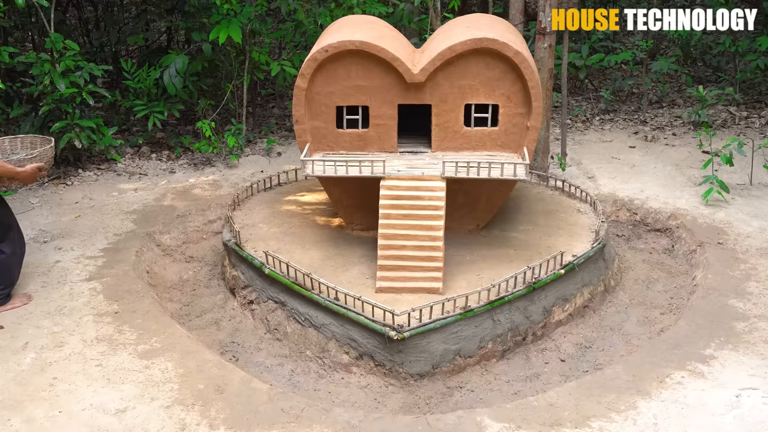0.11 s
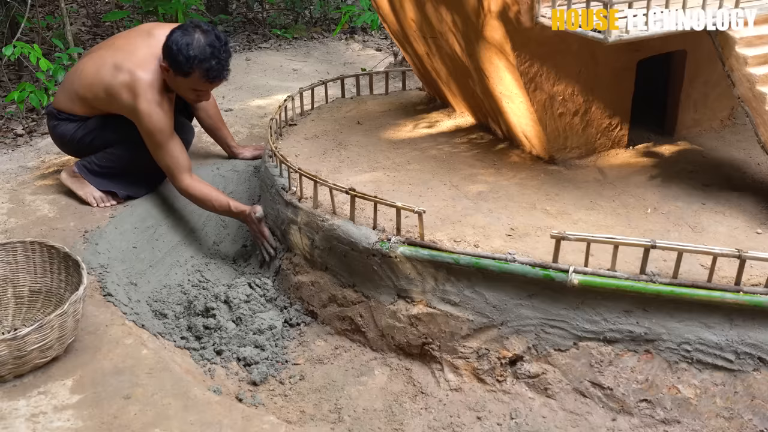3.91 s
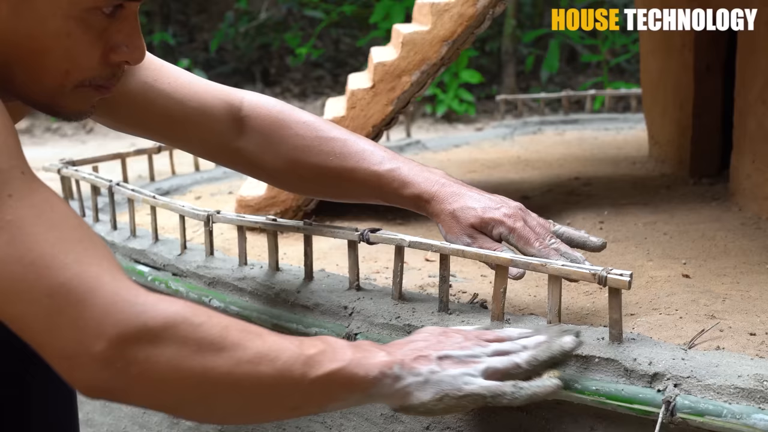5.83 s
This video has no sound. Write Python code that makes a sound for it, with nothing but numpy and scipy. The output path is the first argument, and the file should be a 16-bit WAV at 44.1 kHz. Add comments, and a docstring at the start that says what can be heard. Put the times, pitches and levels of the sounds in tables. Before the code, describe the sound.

A wide hiss of leaves and insects fills a forest clearing, jumping louder with a crackly burst at 0.2 seconds. Close by, dry grit trickles and pebbles and sticks click. Short scrapes of hands on wet cement begin around 1.3 seconds. Hollow bamboo knocks loudly at 1.6 and 2 seconds, each time with spilling grit. Sparse ticks and soft rubs follow. From 4 to 5.8 seconds, palms smooth the gritty cement in a quick run of sandy rasps, with a sharp click at 4.7 and a lighter knock at 5.2. During this stretch a faint engine putters far away and a large bird gives two pairs of faint, low hoots. A small bird trills briefly and very high at 4.5, 5.8 and, faintly, 6.4 seconds. The hiss drops abruptly near 4 and 5.9 seconds. Lighter, slightly squeaky strokes continue until about 7 seconds.

```python
"""In a forest clearing, hands smooth wet, gritty cement along a bamboo railing.
Sand slips under the palms and rasps, dry grit spills, and pebbles and sticks click. Twice the hollow
bamboo knocks loudly. A small bird trills very high, a larger one hoots, and an engine putters far away.
Behind it all is a hiss of leaves and insects, whose loudness and tone switch abruptly three times,
the first time with a brief crackly burst."""
import sys
import numpy as np
from scipy import signal
from scipy.fft import rfft, irfft, next_fast_len
from scipy.io import wavfile

SR = 44100
rng = np.random.default_rng(int(sys.argv[2]) if len(sys.argv) > 2 else 0)


def wav_record(signal):
    """Record a signal, one row per channel, as 16-bit PCM in the file named by sys.argv[1]."""
    frames = np.transpose(np.atleast_2d(signal))
    bounded = np.clip(frames, -1, 1)
    # unit amplitude maps onto the largest positive 16-bit level
    quanta = np.round(bounded * 32767).astype(np.int16)
    wavfile.write(sys.argv[1], SR, quanta)


N = 313551

# how alike left and right are, for wide and for nearby sounds: (frequency [Hz], likeness [0-1])
WIDE_LIKENESS = [(100, 1), (400, 0.9), (1200, 0.49), (3200, 0.43), (7000, 0.19), (14000, 0.074)]
NEAR_LIKENESS = [(200, 0.82), (1200, 1), (3200, 0.94), (7000, 0.62), (14000, 0.59)]
# how far the wave on the left runs ahead of the right: (frequency [Hz], lead [radians])
LEFT_LEAD = [(100, .05), (400, 0.34), (1200, 0.56), (3200, 0.82), (7000, 0.85), (13000, 0.62)]
# the tone of rubbed wet cement and of a dry crunch: (frequency [Hz], level [dB])
RASP_TONE = [(30, -60), (300, -26), (1200, -14), (2000, -7), (2600, -4), (4200, 0), (5600, 0), (8300, 2),
             (11000, 2.5), (15500, 2)]
CRUNCH_TONE = [(30, -56), (150, -15), (500, -10), (1200, 1), (2500, 0), (4000, 1.5), (5800, 3), (9000, 0.5),
               (15500, -2.5)]


def hands():
    """Sand grains slip under the palm; the pressure swells and eases once in each stroke, and flutters."""
    # hand strokes: (start [s], length [s], hardest push [0-1 of the stroke], level [dB],
    # left over right [dB], brightness [dB per octave])
    strokes = [(1.32, .11, .62, -30, 3, 0.5), (1.418, .14, .6, -27.5, 5, 1),
               (1.617, 0.067, 0.13, -20.5, 0, 10), (2.306, 0.1, 0.16, -32.5, 5, 0),
               (3.3, .23, 0.4, -37, 2, -.5), (3.52, .14, .45, -39, 1, 3), (3.7, .22, .5, -40, 3, 4),
               (3.976, .072, 0.56, -25.5, 2.5, 0), (4.055, 0.26, 0.47, -26.5, 2.5, 1),
               (4.345, 0.049, .48, -27, 8.5, 7), (4.584, 0.14, 0.45, -28, 4.5, -0.5),
               (4.716, 0.13, .55, -31.5, 2.5, -0.5), (4.821, .15, 0.6, -31, 4, 0.5),
               (4.952, 0.12, 0.4, -35.5, 4, 5), (5.163, .06, 0.3, -31, 5, -2),
               (5.195, 0.13, 0.6, -26.3, 3, .5), (5.34, .04, .45, -41.5, 1.5, 5),
               (5.407, .09, .25, -43.5, 1, 7), (5.51, .29, 0.38, -25, 3, -.5),
               (5.92, .068, 0.23, -35.5, -4, 1.5), (6.165, .13, 0.15, -36, -5, 1.5),
               (6.364, 0.1, 0.3, -37, -3, -0.5), (6.508, 0.072, 0.5, -33.2, -4, 2),
               (6.793, .086, 0.6, -33, -6, 0.5), (6.862, 0.096, .68, -31, -2, 0)]
    # the hollow under the palm rings:
    # (start [s], length [s], first pitch [Hz], last pitch [Hz], width [Hz], level [dB])
    palm_rings = [(4.09, 0.17, 2440, 2500, 600, -44.5), (4.579, 0.14, 2430, 2540, 800, -39),
                  (4.705, .135, 3120, 3520, 450, -40.5), (4.801, 0.2, 2330, 2450, 550, -45.5),
                  (5.157, .16, 2490, 2450, 800, -40.5), (5.539, 0.2, 3000, 3680, 650, -37),
                  (5.595, .16, 4130, 4320, 330, -36.8), (6.747, 0.12, 4000, 4300, 600, -47)]
    fine_sand_from_s, squeak_db = 5.9, -9
    out = np.zeros((2, N))
    for start, length, hardest, db, pan_db, bright in strokes:
        along = clock(length) / length
        size = len(along)
        arc = np.interp(along, [0, np.clip(hardest, .05, .95), 1], [0, .5, 1])
        push = np.sin(np.pi * arc) ** 0.65
        sand = grains(size, per_s=7000, spread_db=-0.5, share=0.49)
        rasp = stereo(sand, RASP_TONE, NEAR_LIKENESS, focus=0.91)
        rasp = brighten(rasp, bright + 1.2 * (along - .5))  # brighter as the paste smooths out
        if start > fine_sand_from_s:  # fine sand adds a thin squeak
            rasp = rasp + gain_of(squeak_db) * sing(size, hz=11000, width=600)
        flutter_db = 1.1 * wander(size, rate_hz=50)
        add(out, start, rasp * push * gain_of(db + flutter_db) * panned(pan_db))
    for start, length, first_hz, last_hz, width, db in palm_rings:
        size = round(length * SR)
        ring = sing(size, np.linspace(first_hz, last_hz, size), width)
        add(out, start, gain_of(db) * ring * fade(size, 0.038))
    return out


def sing(size, hz, width):
    """Slipping grains set one narrow band of pitches ringing."""
    slip = stereo(rng.standard_normal((2, size)), RASP_TONE, NEAR_LIKENESS)
    return normalize(resonate(resonate(slip, hz, width), hz, width))


def bamboo():
    """Each knock is a few splintery cracks and a short, hollow ring of the cane."""
    # bamboo cracking on hard ground: (time [s], level [dB], rise [s], left over right [dB])
    cracks = [(0.9434, -22, 0.00055, 2), (1.5548, -18, 0.00096, 4), (1.5576, -6, 0.0016, 2),
              (1.5629, -18, 0.00099, -3), (1.9612, -14, 0.0008, 7), (1.964, -9, 0.0015, 2),
              (5.1932, -23.5, 0.00084, -2)]
    # the tone of a crack: (frequency [Hz], level [dB])
    crack_tone = [(30, -50), (120, -34), (350, -16), (700, -7.5), (1300, 4), (1900, -5.5), (2800, 1.5),
                  (3400, -6), (4200, 0), (6300, -3), (9000, -8.5), (15500, -9)]
    # blows on a long pole and a short stake: (time [s], level [dB], pitch [factor], hardness [Hz])
    pole_blows = [(1.5585, -18, 1.0, 4000), (1.5634, -1.5, 0.96, 2500), (1.888, -22.5, 0.81, 1500),
                  (4.6645, -31, 0.9, 4000)]
    stake_blows = [(1.9615, -16.5, 0.87, 5000), (1.9643, -9.5, 1.02, 8000), (1.9672, -1.5, 1.046, 750),
                   (5.193, -18.5, 1.08, 1000)]
    # the notes each one rings with: (pitch [Hz], level [dB], time to fade by 60 dB [s])
    pole_notes = [(280, -15, 0.031), (513, -3.5, 0.024), (1163, 5.5, 0.015), (1040, -19, 0.15),
                  (1243, -10.5, 0.059), (1490, -11, 0.031), (2280, -7, 0.026), (3020, -6, 0.016),
                  (4090, -4, 0.024), (6300, -5, .012)]
    stake_notes = [(236, -15, 0.037), (320, -9.5, 0.021), (415, 3, 0.012), (483, -9, 0.027),
                   (1025, 3.5, 0.014), (2120, -15, 0.018), (2765, 2, 0.019), (4150, 5.5, 0.018),
                   (5800, -12, .012)]
    out, t = np.zeros((2, N)), np.arange(8192) / SR
    for start, db, rise_s, pan_db in cracks:
        burst = stereo(rng.standard_normal((2, len(t))), crack_tone, NEAR_LIKENESS)
        snap = (t / rise_s) * np.exp(1 - t / rise_s)
        add(out, start, gain_of(db) * burst * snap * panned(pan_db))
    for blows, notes in (pole_blows, pole_notes), (stake_blows, stake_notes):
        for start, db, pitch, hard_hz in blows:
            for hz, note_db, ring_s in notes:
                # a soft blow leaves the high notes out
                level = gain_of(db + note_db) / np.hypot(1, (hz * pitch / hard_hz) ** 2)
                swell = 1 - np.exp(-hz * t)  # each note builds up over its first cycle
                lead = np.array([[0], [1]]) * look_up(LEFT_LEAD, hz)
                wave = np.sin(2 * np.pi * hz * pitch * t - lead)
                add(out, start, level * swell * gain_of(-60 * t / ring_s) * wave)
    bass_cut = signal.butter(2, 150, "high", fs=SR, output="sos")  # a slim cane gives off little bass
    return signal.sosfilt(bass_cut, out)


def crackles():
    """Brief, dry, crackly bursts: each is a quick rush that dies away into a trickle."""
    # the first burst comes as the hiss abruptly switches louder; the others are spilling grit:
    # (start [s], rise [s], level [dB], fall [dB per s], left over right [dB], brightness [dB per octave])
    bursts = [(.19, 0.0018, -31.5, 400, 0, 1), (.402, 0.019, -31.5, 70, -7, -2.5),
              (1.44, .06, -38, 110, -5, -1), (1.565, .002, -23.5, 102, 5.5, 0),
              (1.601, 0.0071, -17.3, 380, -4, .3), (1.967, 0.0079, -19.5, 520, 4, 1)]
    trickle_db, trickle_fall_db_per_s = -14, 88
    out, t = np.zeros((2, N)), clock(.5)
    for start, rise_s, db, fall_db_per_s, pan_db, bright in bursts:
        since_peak = np.maximum(t - rise_s, 0)
        rush = gain_of(-fall_db_per_s * since_peak) * panned(pan_db)
        trickle = gain_of(trickle_db - trickle_fall_db_per_s * since_peak) * panned(-12)
        level = gain_of(db) * np.minimum(t / rise_s, 1) * np.hypot(rush, trickle)
        coarse = grains(len(t), per_s=5500, spread_db=1.5, share=0.51)
        crunch = stereo(coarse, CRUNCH_TONE, WIDE_LIKENESS, focus=1.8)
        add(out, start, brighten(crunch, bright) * level)
    return out


def clicks():
    """A brief crunch rings a pebble or a stick around one pitch."""
    # small taps: (time [s], level [dB], pitch [Hz], width [Hz], left over right [dB])
    taps = [(.578, -32, 10000, 6000, 0), (.767, -30, 10000, 6000, 0), (.829, -27.5, 7000, 5000, -6),
            (0.9428, -19.5, 3080, 330, 0), (1.2, -24.5, 11000, 7000, 2), (1.492, -27, 8000, 9000, 0),
            (2.314, -26, 12000, 7000, 4), (2.356, -26, 7000, 12000, 1), (2.8563, -27, 4140, 4500, -9),
            (2.864, -32.5, 4200, 3500, -11), (3.58, -28, 10000, 9000, 0), (4.6642, -20.5, 3320, 3500, -2),
            (5.057, -35, 12000, 7000, -1)]
    out, t = np.zeros((2, N)), np.arange(2048) / SR
    for start, db, hz, width, pan_db in taps:
        crunch = stereo(rng.standard_normal((2, len(t))), CRUNCH_TONE, NEAR_LIKENESS) * np.exp(-t / .002)
        ring = resonate(resonate(crunch, hz, width), hz, width)
        add(out, start, gain_of(db) * ring / np.std(ring[:, :160]) * panned(pan_db))
    return out


def small_bird():
    """A thin, almost pure whistle quivers fast, often with a louder opening (the accent)."""
    # trills: (start [s], length [s], pitch [Hz], slide [Hz per s], level [dB], accent [dB],
    # left over right during the accent [dB])
    trills = [(4.541, 0.095, 8960, -400, -25.5, 3, 4), (5.72, .08, 5100, 600, -47, 0, 0),
              (5.844, 0.083, 8740, 500, -29.5, 11, 11), (5.866, 0.065, 5190, 1500, -45, -2, 0),
              (6.425, .1, 8615, 0, -46, 7, -4)]
    accent_at_s, accent_width_s, fall_db_per_s = .015, 0.01, 21
    out = np.zeros((2, N))
    for start, length, hz, slide, db, accent_db, pan_db in trills:
        t = clock(length)
        size = len(t)
        accent = np.exp(-((t - accent_at_s) / accent_width_s) ** 2)
        level = gain_of(db + accent_db * accent - fall_db_per_s * t) * fade(size, .004)
        pitch_hz = hz + slide * t + 45 * wander(size, rate_hz=210)
        whistle = np.exp(2j * np.pi * np.cumsum(pitch_hz) / SR)
        # echoes from trunks mix with the whistle and make it flicker, differently on each side
        echoes = np.array([wander(size, 190) + 1j * wander(size, 110) for side in range(2)])
        trill = normalize((whistle * (1 + 0.71 * echoes)).real)
        add(out, start, level * trill * panned(pan_db * accent))
    return out


def large_bird():
    """Two pairs of low, pure hoots come from deep in the trees."""
    # hoots: (time [s], level [dB])
    hoots = [(4.535, -50), (4.705, -49), (5.24, -49.5), (5.42, -52)]
    pitch_hz = 167
    out, t = np.zeros((2, N)), clock(.115)
    hoot = normalize(np.sin(2 * np.pi * pitch_hz * t) * fade(len(t), 0.033))
    for start, db in hoots:
        add(out, start, gain_of(db) * hoot)
    return out


def engine():
    """A far one-cylinder engine, loudest as it comes in: only the boom of each firing carries."""
    start_s, end_s, firings_per_s = 3.975, 5.925, 23
    level_db, fall_db_per_s = -55.5, 2
    out, t = np.zeros((2, N)), clock(end_s - start_s)
    surge_db = 4.5 * np.exp(-((t - 0.11) / .09) ** 2)
    level = gain_of(level_db - fall_db_per_s * t + surge_db)
    cycles = np.cumsum(firings_per_s * (1 + 0.019 * wander(len(t), rate_hz=10))) / SR
    firings = np.diff(np.floor(cycles), prepend=0) * gain_of(wander(len(t), rate_hz=23))
    boom = resonate(resonate(firings, hz=182, width=47), hz=181, width=73)
    add(out, start_s, level * normalize(boom) * fade(len(t), .01))
    return out


def forest():
    """Leaves and distant insects make a wide, slightly restless hiss in four stretches."""
    # stretches of hiss, each lasting until the next:
    # (start [s], level it drifts toward [dB], extra at the start [dB], share from the front [0-1])
    stretches = [(0, -42, 0, .5), (.19, -33.5, 2.9, 1.0), (3.975, -39, 2.5, 0.81), (5.925, -37, -8, .53)]
    # the tone of the hiss, one list for each stretch: (frequency [Hz], level [dB])
    tones = [
        [(40, -47), (103, -11), (200, -17), (400, -8.5), (1100, -2.5), (2000, -5), (4000, -5.5), (6600, -9.5),
         (7250, 2), (7900, -11), (15500, -14)],
        [(18, -66), (30, -34), (130, -19), (173, -10.5), (249, -13.5), (332, -5), (479, -2), (532, -2),
         (996, 0), (1110, 0), (1720, 0), (2180, 0), (3400, 0.5), (8950, -3), (15500, -7.5)],
        [(24, -58), (40, -42), (91, -13.5), (192, -10), (472, -3.5), (606, -5.5), (758, -2.5), (838, -3),
         (998, -0.5), (1520, -1), (1680, -1.5), (2640, 0.5), (15500, -9)],
        [(30, -40), (80, -27.5), (170, -19), (370, -9), (600, -5.5), (1000, -2.5), (1600, -3.5), (3000, -3.5),
         (4900, -5), (9000, -8), (15500, -14)],
    ]
    settle_s = 1.6
    out, ends = np.zeros((2, N)), [row[0] for row in stretches[1:]] + [N / SR]
    for (start, db, extra_db, focus), end, tone in zip(stretches, ends, tones):
        t = clock(end - start)
        rustle = grains(len(t), per_s=4000, spread_db=1.7, share=0.092)
        leaves = stereo(rustle, tone, WIDE_LIKENESS, focus)
        level_db = db + extra_db * np.exp(-t / settle_s) + 0.19 * wander(len(t), rate_hz=48)
        add(out, start, leaves * gain_of(level_db))
    return out


def clearing_echo(sound):
    """Trunks and clay walls scatter the sound into a short, thin echo."""
    # the tone of what they throw back: (frequency [Hz], level [dB])
    echo_tone = [(60, -20), (400, 4), (1200, -5), (4000, -0.5), (12000, 1.5)]
    # how long the echo lasts: (frequency [Hz], time to fade by 60 dB [s])
    fade_times = [(150, 0.34), (1000, 0.15), (4000, 0.14), (15000, 0.5)]
    scatter = stereo(rng.standard_normal((2, SR // 2)), echo_tone, WIDE_LIKENESS, focus=2.0)
    hz, t, bands = signal.stft(scatter, SR, nperseg=256)
    decay = gain_of(-60 * t / look_up(fade_times, hz)[:, None])
    tail = signal.istft(bands * decay, SR, nperseg=256)[1]
    tail *= 1 + 0.83 * np.exp(-np.arange(tail.shape[1]) / SR / 0.023)  # the nearest walls answer first
    tail[:, :200] = 0  # a short gap before the echo arrives
    return signal.fftconvolve(sound, tail / np.linalg.norm(tail[0]), axes=1)[:, :N]


def grains(size, per_s, spread_db, share):
    """Two streams of tiny, uneven ticks over a smooth hiss; share is the ticks' part of the power."""
    ticks = (rng.random((2, size)) < per_s / SR) * rng.choice([-1, 1], (2, size))
    ticks = ticks * gain_of(spread_db * np.minimum(rng.exponential(1, (2, size)), 4))
    return np.sqrt(share) * normalize(ticks) + np.sqrt(1 - share) * rng.standard_normal((2, size))


def stereo(pair, tone, likeness, focus=1):
    """Gives two noises a tone and blends them into left and right; more focus makes the sides alike."""
    size = next_fast_len(pair.shape[1] + 512)
    hz = np.fft.rfftfreq(size, 1 / SR)
    first, second = rfft(pair, size)
    same = np.clip(focus * look_up(likeness, hz), 0, 1)
    common, apart = np.sqrt((1 + same) / 2) * first, np.sqrt((1 - same) / 2) * second
    right_lag = np.exp(-1j * look_up(LEFT_LEAD, hz))
    sides = np.array([common + apart, (common - apart) * right_lag])
    out = irfft(sides * gain_of(look_up(tone, hz)), size)[:, :pair.shape[1]]
    return out / np.std(out.mean(0))


def brighten(sound, db_per_octave):
    """Turns the body of a rasp down (or up) against its fizz, which lies two octaves higher."""
    body = signal.sosfiltfilt(signal.butter(2, 6000, fs=SR, output="sos"), sound)
    return sound + body * (gain_of(-2 * db_per_octave) - 1)


def resonate(sound, hz, width):
    """Makes a sound ring at a steady or sliding pitch; a smaller width [Hz] rings longer."""
    spin = np.exp(2j * np.pi * np.cumsum(hz * np.ones(sound.shape[-1])) / SR)
    decay = np.exp(-np.pi * width / SR)
    return 2 * (spin * signal.lfilter([1 - decay], [1, -decay], sound / spin)).real


def wander(size, rate_hz):
    """A smooth random wobble with a typical size of 1."""
    count = next_fast_len(size + SR // 4)
    smooth = np.exp(-(np.fft.rfftfreq(count, 1 / SR) / rate_hz) ** 2)
    return normalize(irfft(rfft(rng.standard_normal(count)) * smooth, count))[:size]


def fade(size, seconds):
    """A steady level with a soft start and end."""
    return signal.windows.tukey(size, min(2 * seconds * SR / size, 1))


def clock(seconds):
    """The time of each sample in a sound of this length."""
    return np.arange(round(seconds * SR)) / SR


def gain_of(db):
    """Turns decibels into a number to multiply by."""
    return 10 ** (np.asarray(db) / 20)


def normalize(sound):
    """Scales a sound to an average power of 1."""
    return sound / np.sqrt(np.mean(sound ** 2) + 1e-20)


def look_up(table, hz):
    """Reads between the rows of a table, giving each octave equal room."""
    row_hz, values = np.transpose(table)
    return np.interp(np.log(hz + 1), np.log(row_hz + 1), values)


def panned(pan_db):
    """Left and right gains, with the left louder by pan_db."""
    return gain_of(np.array([[.5], [-.5]]) * pan_db)


def add(mix, start_s, sound):
    """Mixes a sound in at the given time."""
    part = mix[:, max(round(start_s * SR), 0):][:, :sound.shape[-1]]
    part += sound[..., :part.shape[1]]


def scene():
    """Work close by, with the forest all around."""
    knocks, ticks, strokes = bamboo(), clicks(), hands()
    echoes = clearing_echo(gain_of(-10) * knocks + ticks + gain_of(-9) * strokes)
    work = strokes + knocks + ticks + echoes
    return work + forest() + crackles() + small_bird() + large_bird() + engine()


def record(dry):
    """The peaks of the loudest knocks are flattened, then the very highest treble is cut."""
    top_hz = 15850
    treble_cut = signal.firwin(511, top_hz, window=("kaiser", 9), fs=SR)
    return signal.oaconvolve(np.clip(dry, -1, 1), treble_cut[None], "same")


dry = scene()
out = record(dry)
wav_record(out)
```